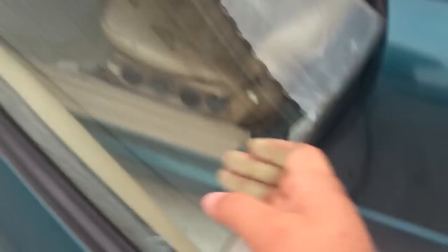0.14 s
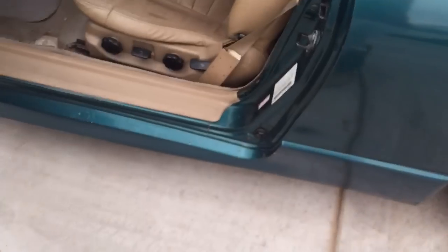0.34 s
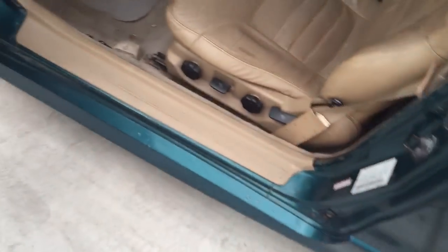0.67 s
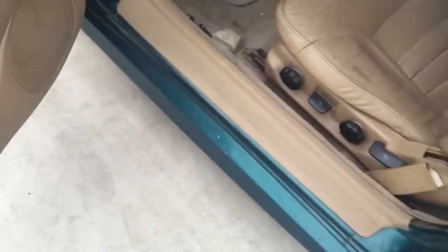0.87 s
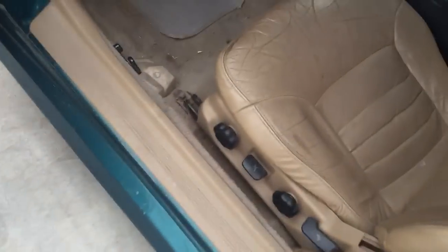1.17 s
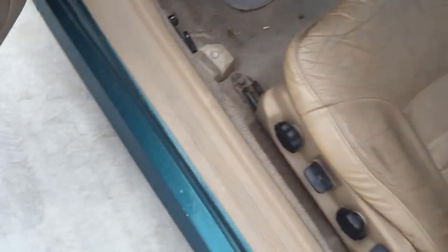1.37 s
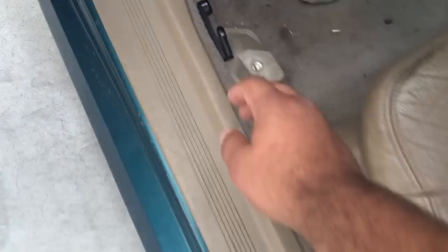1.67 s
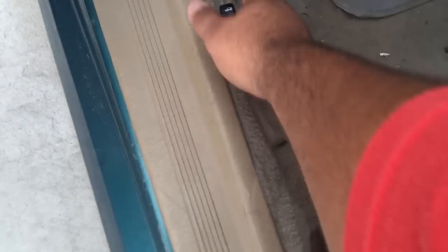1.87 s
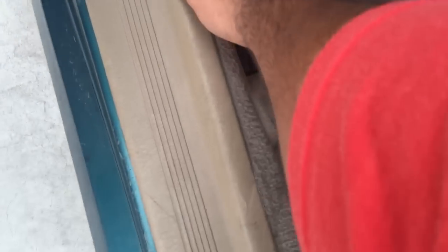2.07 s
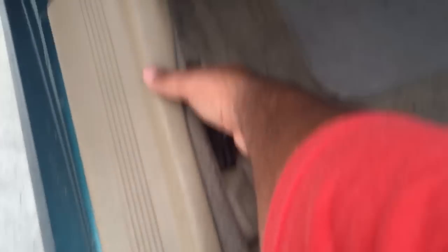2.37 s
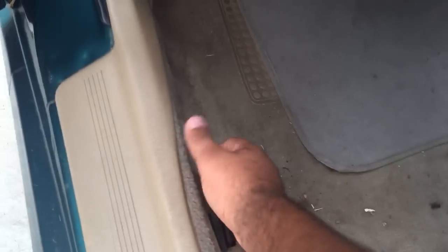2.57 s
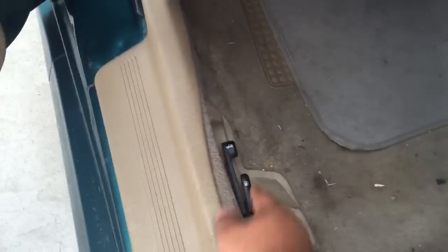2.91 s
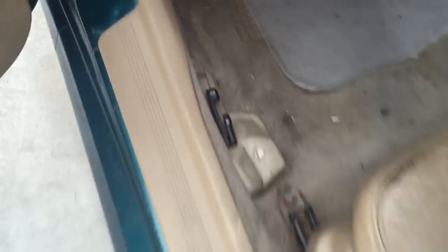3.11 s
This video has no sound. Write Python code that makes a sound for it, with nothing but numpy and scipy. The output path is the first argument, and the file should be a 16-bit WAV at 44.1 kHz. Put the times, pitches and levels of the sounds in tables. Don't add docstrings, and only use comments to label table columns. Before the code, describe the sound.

Close outdoor pickup of a car door rubbing open and knocking over its stops, then faint cloth and trim movement, a soft hand landing, and finally a low thud followed by a very sharp plastic clack.

```python
import sys
import numpy as np
from scipy import signal
from scipy.fft import rfft, irfft, next_fast_len
from scipy.io import wavfile
from scipy.ndimage import uniform_filter1d, map_coordinates

SR = 44100
rng = np.random.default_rng(int(sys.argv[2]) if len(sys.argv) > 2 else 0)


def linear_from_db(decibels):
    return 10 ** (np.asarray(decibels, float) / 20)


def put_to_file(sound):
    columns = np.atleast_2d(sound).T
    safe = np.clip(columns, -1, 1)
    whole_steps = np.round(safe * 32767)
    wavfile.write(sys.argv[1], SR, whole_steps.astype(np.int16))


N = 143325

# (frequency [Hz], level [dB])
METAL_COLOUR = [(180, -37.5), (300, -5.5), (641, -10.5), (1750, -18.5), (2140, -14.5), (5950, -24.5),
                (9600, -32), (12100, -28.5), (15500, -42)]


def unit(x):
    return x / np.sqrt(np.mean(x ** 2) + 1e-20)


def along(points, hz):
    f, v = np.transpose(points)
    return np.interp(np.log(hz + 1), np.log(f + 1), v)


def curve(rows, column=1):
    columns = np.transpose(rows)
    return np.interp(np.arange(N) / SR, columns[0], columns[column], left=-120, right=-120)


def wobble(rate_hz):
    knots = rng.standard_normal(int(N * rate_hz / SR) + 4)
    return map_coordinates(knots, [np.arange(N) * rate_hz / SR])


def filtered(x, response):
    m = next_fast_len(len(x) + 8192)
    return irfft(rfft(x, m) * response(np.fft.rfftfreq(m, 1 / SR)), m)[:len(x)]


def above(hz):
    return lambda f: -f * f / (hz * hz - f * f + 1.4j * f * hz)


def add(out, s, x):
    part = out[max(round(s * SR), 0):][:len(x)]
    part += x[:len(part)]


def blows(rows, modes, colour, rise_s, swell_s, scatter, soft_hz):
    grit_db, uneven_db = 2, 2.5
    treble_hz, treble_life = 3860, 0.69
    loose_hz = 257
    crack_low_hz = 300
    out, t = np.zeros(N), np.arange(SR // 2) / SR
    hz, db, ring_s = np.transpose(modes)[:, :, None]
    for s, crack_db, ring_db, t60 in rows:
        ripple_db = uneven_db * rng.standard_normal(80)

        def contact(f):
            level_db = along(colour, f) + np.interp(f, np.arange(80) * 280, ripple_db)
            return linear_from_db(level_db) / (1 + (f / soft_hz) ** 3)

        noise = unit(filtered(rng.standard_normal(len(t)), contact))
        treble = filtered(noise, above(treble_hz))
        grit = linear_from_db(grit_db * rng.standard_normal(len(t) // 50).repeat(50))
        decaying = (noise - treble) * linear_from_db(-60 * t / t60) + treble * linear_from_db(-60 * t / t60 / treble_life)
        crack = filtered(grit * (1 - np.exp(-t / rise_s)) * decaying, above(crack_low_hz))

        waver = unit(uniform_filter1d(rng.standard_normal((len(modes), len(t))), size=100))
        flicker = unit(uniform_filter1d(rng.standard_normal(waver.shape), size=700))
        turns = np.cumsum(hz + (hz + loose_hz) * scatter * waver, 1) / SR + rng.random((len(modes), 1))
        level = linear_from_db(26 * scatter * flicker) * linear_from_db(db - 60 * t / ring_s)
        ring = (level * np.sin(2 * np.pi * turns)).sum(0)
        swell = 1 - np.exp(-(t / swell_s) ** 2)
        add(out, s, linear_from_db(crack_db) * crack + linear_from_db(ring_db - 3) * ring * swell)
    return out


def strokes(rows, band, edge_s, swell, fade, grain_db, ripple_db):
    out, t = np.zeros(N), np.arange(SR // 4) / SR
    for s, length_s, db, hz in rows:
        grit = linear_from_db(grain_db * rng.standard_normal(len(t) // 25).repeat(25))
        uneven_db = ripple_db * rng.standard_normal(40)
        attack = np.clip(t / (edge_s + swell * length_s), 0, 1)
        decay = linear_from_db(-22 * np.clip((t / length_s - 1 + fade) / fade, 0, 9) ** 1.36)
        colour = lambda f: band(f + 1, hz) * linear_from_db(np.interp(f, np.arange(40) * 560, uneven_db))
        noise = unit(filtered(rng.standard_normal(len(t)), colour))
        add(out, s, linear_from_db(db) * attack * decay * grit * noise)
    return out


def outdoors():
    # (frequency [Hz], level [dB])
    air_colour = [(24, -32), (40, 0), (119, -1), (384, -14.5), (568, -21), (1000, -27), (1300, -64.5),
                  (2200, -120)]
    # (frequency [Hz], level [dB])
    hiss_colour = [(410, -32), (700, -9.5), (1340, -9.5), (1990, -11.5), (13700, -22.5), (15800, -30.5)]
    # (time [s], level [dB])
    breeze = [(0, 5), (.25, -5.5), (1, 2), (1.6, -3), (2.3, 2), (3.25, 0)]
    # (time [s], level [dB])
    hum_level = [(1.8, -80), (1.95, -69.5), (2.3, -71), (2.7, -70)]
    air_db, hiss_db, hum_hz = -62, -73.5, 564
    gusty = rng.standard_normal(N) * linear_from_db(0.83 * wobble(15) + 0.5 * wobble(0.85))
    air = unit(filtered(gusty, lambda f: linear_from_db(along(air_colour, f))))
    hiss = unit(filtered(rng.standard_normal(N), lambda f: linear_from_db(along(hiss_colour, f))))
    hiss = hiss * linear_from_db(0.66 * wobble(1.9))
    hum = np.sin(2 * np.pi * np.cumsum(hum_hz + 0.5 * wobble(27)) / SR)
    hum = linear_from_db(curve(hum_level) + 0.92 * wobble(12)) * hum
    return linear_from_db(air_db + curve(breeze)) * air + linear_from_db(hiss_db) * hiss + hum


def wind_puffs():
    # (time [s], length [s], level [dB], frequency [Hz])
    puffs = [(0, 0.022, -45, 55), (0.354, 0.04, -48, 68), (0.411, 0.085, -49.5, 50),
             (0.871, 0.036, -47, 69), (0.898, 0.086, -44, 57.3), (1.256, 0.056, -36, 80.4),
             (1.291, 0.051, -49, 51.3), (1.331, 0.045, -44.5, 54.7), (1.468, 0.035, -51.5, 59.6),
             (1.951, 0.063, -54.5, 70.6), (2.697, 0.1, -34, 53.4), (2.21, .11, -58, 64.8),
             (2.82, .12, -54.5, 55), (2.981, .1, -55, 61)]
    out = np.zeros(N)
    for s, length_s, db, hz in puffs:
        t = np.arange(int(length_s * SR)) / SR
        turn, sag = rng.uniform(0, 2 * np.pi), rng.normal(0.789, 0.32)
        bend = 0.9 * np.sin(2 * np.pi * hz * t * sag)
        swing = np.sin(2 * np.pi * hz * t + turn + bend)
        add(out, s, linear_from_db(db + 4) * np.sin(np.pi * t / length_s) ** 2 * swing)
    return out


def scuffs():
    # (time [s], length [s], level [dB], centre [Hz])
    rubs = [(.87, 0.064, -66, 4500), (.915, 0.051, -75, 9000), (1.124, 0.052, -50, 5000),
            (1.127, 0.032, -54, 13000), (.592, 0.026, -44.5, 6900), (1.175, .035, -68.5, 6000),
            (1.3, 0.03, -65.5, 9000), (1.62, 0.23, -75.5, 2020), (2.2, .02, -73.5, 3470),
            (2.575, 0.091, -60, 4500), (3, 0.077, -67.5, 2000), (2.72, 0.011, -60.5, 14100),
            (3.02, 0.052, -63.5, 6790)]
    width_octaves = 1.12
    broad = lambda f, hz: np.exp(-(np.log2(f / hz) / width_octaves) ** 2) / (1 + (1100 / f) ** 6)
    return strokes(rubs, broad, edge_s=0.003, swell=0.24, fade=0.39, grain_db=3, ripple_db=0)


def creaks():
    # (time [s], length [s], level [dB], frequency [Hz])
    slips = [(.811, 0.025, -50, 600), (1.13, 0.041, -56.5, 1630), (1.16, 0.045, -55.5, 386),
             (2.596, 0.0078, -54.5, 5900), (1.72, 0.029, -59, 330), (2.5, 0.03, -62.5, 1260),
             (2.208, 0.04, -58, 190), (2.272, 0.036, -59, 630), (2.254, 0.019, -57, 600),
             (2.275, 0.028, -69.5, 2100), (2.535, 0.024, -64.5, 1520), (2, .04, -58, 320),
             (1.48, 0.021, -71, 620), (0, 0.038, -45.5, 215), (2.1, .008, -70, 7300),
             (2.58, 0.1, -66.5, 1150), (3.225, 0.026, -63, 800), (3.225, 0.032, -58, 280)]
    q = 5.3
    narrow = lambda f, hz: (1 / (1 + (q * (f / hz - hz / f)) ** 2)
                            + 0.059 * np.exp(-np.log2(f / hz) ** 2 / 3))
    return strokes(slips, narrow, edge_s=0.0021, swell=0, fade=0.42, grain_db=2, ripple_db=-2)


def rubber_squeaks():
    # (time [s], length [s], level [dB], frequency [Hz])
    slips = [(0.63, 0.022, -50.5, 940), (.49, 0.054, -60, 2160), (.66, .025, -66, 2650),
             (0.61, .03, -60, 2030), (.826, 0.027, -55.5, 2450), (1.298, .025, -61, 2600),
             (2.72, 0.034, -68.5, 4220), (.35, 0.027, -50, 2480)]
    q = 19
    thin = lambda f, hz: 1 / (1 + (q * (f / hz - hz / f)) ** 2)
    return strokes(slips, thin, edge_s=0.003, swell=0.14, fade=0.4, grain_db=0.5, ripple_db=-7)


def hand_on_sill():
    # (time [s], crack [dB], ring [dB], rattle t60 [s])
    landings = [
        (1.606, -52, -44.5, 0.11),
        (1.695, -69, -58, 0.15),
    ]
    # (frequency [Hz], level [dB], t60 [s])
    sill = [(149.4, -10.5, 0.79), (219.8, 1, 0.49), (369, -2.5, 0.45), (422, 9.5, 0.054), (747, -2.5, 0.15),
            (1122, -3, 0.11), (1470, 0.5, 0.087)]
    return blows(landings, sill, METAL_COLOUR, rise_s=0.002, swell_s=0.0046, scatter=0.085, soft_hz=7700)


def latch_release():
    # (time [s], crack [dB], ring [dB], rattle t60 [s])
    thuds = [
        (2.7, -53, -43, 0.11),
        (2.706, -44.5, -26, 0.12),
        (2.721, -45.5, -28.5, .12),
    ]
    # (frequency [Hz], level [dB], t60 [s])
    body = [(100.3, -11.5, 0.64), (173.6, 1, 0.32), (228.7, -6, 0.3), (283.7, -8.5, 0.5),
            (346.6, -8.5, 0.55), (429, -11, 0.24), (491.4, -7.5, 0.31), (642, -8, 0.33), (761, -11, .28),
            (1012, -7.5, 0.17), (1171, -7, 0.13), (1497, -16, .15), (1900, -19, .12), (2350, -22, .1)]
    return blows(thuds, body, METAL_COLOUR, rise_s=0.0073, swell_s=0.0091, scatter=0.07, soft_hz=2300)


def lever_snap():
    # (time [s], crack [dB], ring [dB], rattle t60 [s])
    contacts = [
        (2.884, -38.5, -60, 0.032),
        (2.899, -58.5, -34.5, 0.06),
        (2.903, -63, -37, 0.061),
        (2.912, -47, -60.5, .06),
        (2.9202, -13, -14.5, 0.032),
        (2.9222, -18, -18.5, 0.027),
        (2.9252, -25.5, -16.5, 0.055),
        (2.9325, -42.5, -30.5, 0.14),
    ]
    # (frequency [Hz], level [dB], t60 [s])
    lever = [(250, -13.5, 0.1), (328, -12, 0.14), (424, -15, 0.21), (558, -11.5, 0.099), (761, -12, .12),
             (1103, -2.5, .045), (1422, 4, 0.028), (1690, -5.5, .03), (2519, -4.5, 0.045),
             (3310, -14.5, .045), (5520, -13, 0.029), (6632, -16, 0.04), (8660, -17, 0.041),
             (10070, -15.5, .022)]
    # (frequency [Hz], level [dB])
    plastic = [(180, -26.5), (300, -10), (1520, -3), (3060, -11.5), (6720, -10.5), (7560, -19),
               (14000, -15.5), (15500, -21.5), (16300, -29.5)]
    return blows(contacts, lever, plastic, rise_s=0.00055, swell_s=0.00068, scatter=0.041, soft_hz=29000)


def glass_shakes():
    # (time [s], crack [dB], ring [dB], rattle t60 [s])
    shakes = [(0, -33.5, -51, 0.05), (.016, -57, -44.5, .06), (.224, -46.5, -59, .08),
              (.297, -46, -45, 0.093), (.328, -48, -41.5, 0.054), (.338, -41, -38, .06),
              (.345, -34.5, -40.5, 0.082)]
    # (frequency [Hz], level [dB], t60 [s])
    glass = [(302.7, 9.5, 0.16), (467, -7, 0.076), (640, 5.5, 0.095), (1327, -5.5, 0.13), (2466, -1, 0.098)]
    return blows(shakes, glass, METAL_COLOUR, rise_s=0.003, swell_s=0.0052, scatter=0.049, soft_hz=4500)


def seal_pops():
    # (time [s], crack [dB], ring [dB], rattle t60 [s])
    pops = [
        (.105, -31, -35.5, 0.054),
        (.111, -38.5, -42, .13),
    ]
    # (frequency [Hz], level [dB], t60 [s])
    trim = [(697, 1.5, 0.1), (1307, -6, 0.13), (2040, 0, 0.078), (2640, -5, 0.076), (3570, -4, .05),
            (4070, -1.5, .1)]
    return blows(pops, trim, METAL_COLOUR, rise_s=0.0011, swell_s=0.0027, scatter=0.037, soft_hz=20000)


def strap_knocks():
    # (time [s], crack [dB], panel [dB], rattle t60 [s])
    first = [
        (.589, -29, -26, 0.068),
        (.5955, -30, -27.5, 0.099),
    ]
    # (frequency [Hz], level [dB], t60 [s])
    door = [(145, -6.5, 0.58), (201, -13, 0.14), (221.2, 1, 0.31), (331, -22, 0.28), (470.7, -5.5, 0.21),
            (547, -3.5, .16), (591, 10.5, 0.083), (664, -2.5, 0.19), (697, -8.5, 0.17), (1152, -13, 0.11),
            (1480, -16, 0.12), (1613, -15, 0.14), (2310, -26, .12), (2638, -28, 0.088)]
    # (time [s], crack [dB], panel [dB], rattle t60 [s])
    second = [
        (.7345, -39.5, -37, 0.046),
        (.738, -33.5, -36.5, 0.076),
    ]
    # (frequency [Hz], level [dB], t60 [s])
    frame = [(145, -9.5, 0.52), (218.7, 0, 0.66), (325.5, -2, 0.27), (397, -8, 0.19), (560, -3.5, 0.14),
             (1000, -18, 0.13), (1320, -14, 0.068), (2330, -4, 0.075)]
    return (blows(first, door, METAL_COLOUR, rise_s=0.0019, swell_s=0.0077, scatter=0.032, soft_hz=22000)
            + blows(second, frame, METAL_COLOUR, rise_s=0.0011, swell_s=0.0052, scatter=0.05, soft_hz=8200))


def hinge():
    # (time [s], rubbing level [dB], balance of the skin resonances [0-1])
    swing = [(0, -56, 0.5), (.08, -54, 0.4), (.2, -55.5, 0.15), (.24, -52, 0), (.3, -53, 0.34),
             (.42, -59, 0.91), (.52, -56, 0.98), (.72, -58, 1), (.82, -58.5, 0.57), (.92, -73, 0)]
    # (frequency [Hz], width [Hz], level at balance 0 [dB], level at balance 1 [dB])
    skin = [(332, 170, -0.5, 8.5), (610, 260, 5.5, -1), (923, 290, -14.5, 4), (1304, 93, 3.5, -40),
            (2080, 310, -4, -1.5), (2610, 200, -5, -7), (3213, 350, -5, -10), (3476, 180, -3.5, -9),
            (6000, 5400, -35, -24)]
    drift = 0.035
    balance = np.clip(curve(swing, column=2), 0, 1)
    rub = np.zeros(N)
    for hz, width_hz, first_db, second_db in skin:
        friction = rng.standard_normal(N) * linear_from_db(0.69 * wobble(300))
        resonance = lambda f: (1j * f * width_hz / (hz * hz - f * f + 1j * f * width_hz)) ** 2
        band = filtered(friction, resonance)
        warped = np.arange(N) + 9 * wobble(25) + np.cumsum(drift * wobble(9))
        band = np.interp(warped, np.arange(N), band)
        rub += band * linear_from_db(first_db + (second_db - first_db) * balance + 2.6 * wobble(22))
    return linear_from_db(curve(swing) + 13.5) * rub


def scene():
    around = outdoors() + wind_puffs()
    small = scuffs() + creaks() + rubber_squeaks()
    inside = hand_on_sill() + latch_release() + lever_snap()
    door = glass_shakes() + seal_pops() + strap_knocks() + hinge()
    return (around + small + inside + door)[None]


def overall_response(f):
    low_hz, dip_hz, dip_db, top_hz, top_db = 42.8, 10330, -5, 15450, -28.5
    dip = dip_db * np.exp(-((f - dip_hz) / 300) ** 2)
    shelf = top_db / (1 + np.exp(np.clip((top_hz - f) / 130, -50, 50)))
    return above(low_hz)(f) * linear_from_db(dip + shelf)


def low_pass(x):
    return signal.sosfilt(signal.butter(12, 16460, fs=SR, output="sos"), x)


def record(dry):
    mix = filtered(dry[0], overall_response)[None]
    return low_pass(mix)


dry = scene()
out = record(dry)
put_to_file(out)
```